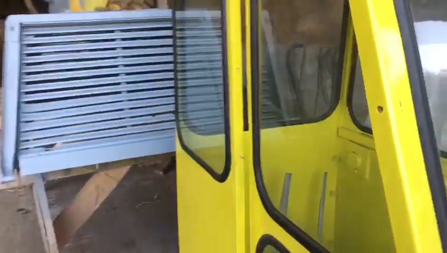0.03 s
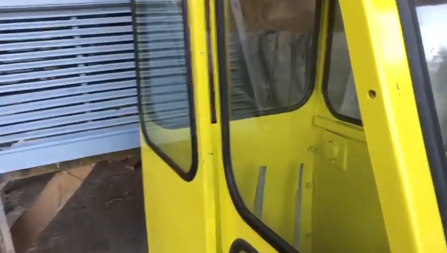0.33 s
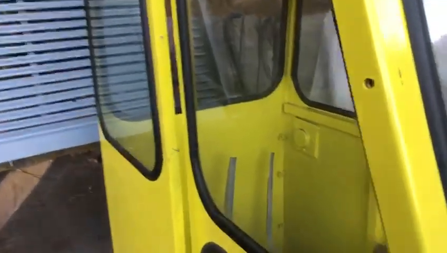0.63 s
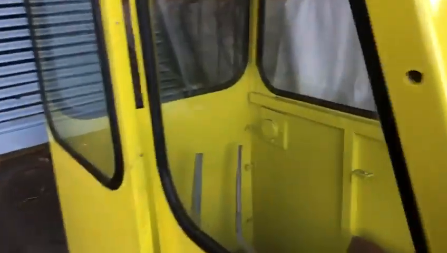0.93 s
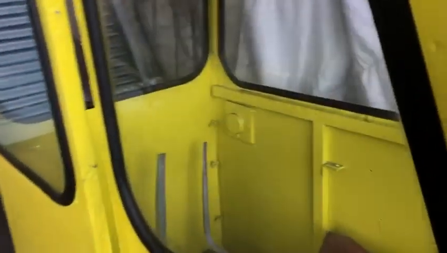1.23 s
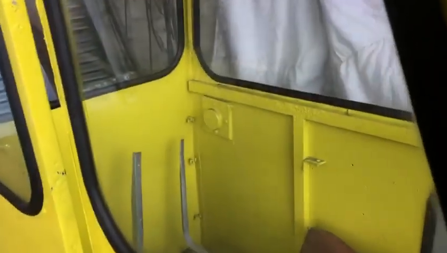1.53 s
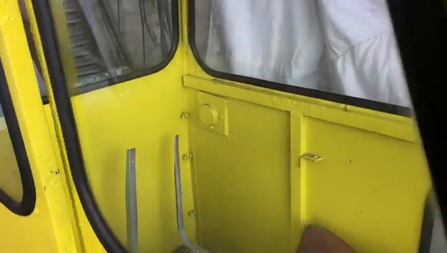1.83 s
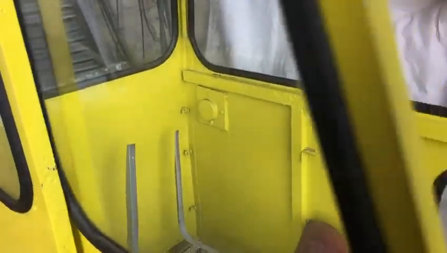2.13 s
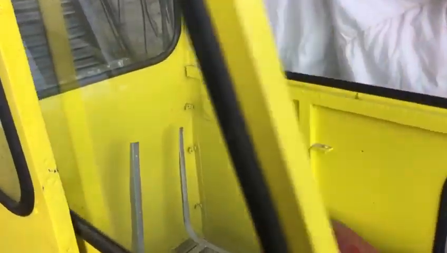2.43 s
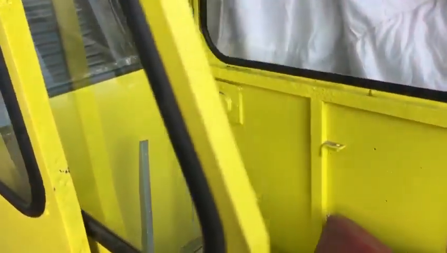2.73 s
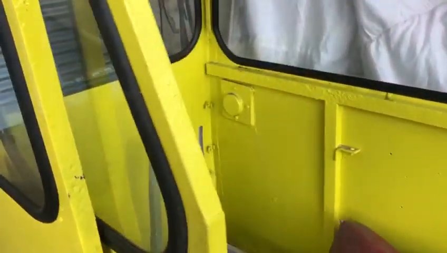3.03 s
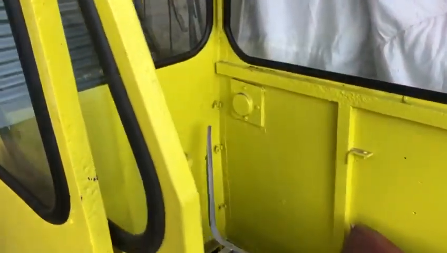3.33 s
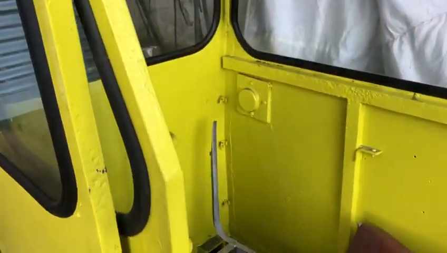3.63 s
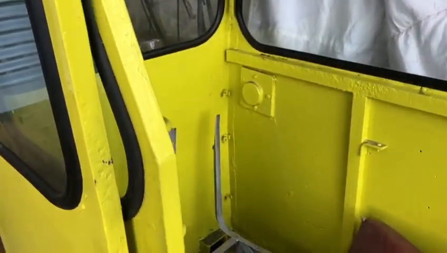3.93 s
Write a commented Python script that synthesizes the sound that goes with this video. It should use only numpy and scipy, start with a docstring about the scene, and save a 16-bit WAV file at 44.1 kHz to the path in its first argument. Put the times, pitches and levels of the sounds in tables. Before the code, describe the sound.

A metal sliding door on a machine cab, heard close up in a workshop. Soft rustling and small ticks come first, then the door rolls with a low rumble, scraping and ringing clatter, ending with a sharp latch knock.

```python
"""A workshop, the microphone close to the steel sliding door of a machine cab.
At first there is only a steady low background, a rustling sleeve, small ticks and a soft bump.
From 1.8 s the door is pushed along its track: the rollers rumble through the panels, while the
runner scrapes in tiny slips, squeals faintly twice and rattles, ringing the rail.
The latch ticks near 3 s and knocks at 3.7 s, as the rolling dies down."""
import sys
import numpy as np
from scipy import signal
from scipy.io import wavfile

SR = 44100
rng = np.random.default_rng(int(sys.argv[2]) if len(sys.argv) > 2 else 0)


def digitize_waveform(pressure):
    """Quantize a signal to 16-bit integers and store it at the path in sys.argv[1].

    Rows of a 2-D input are taken as channels; values are limited to [-1, 1].
    """
    field = np.atleast_2d(pressure).T
    bounded = np.clip(field, -1, 1)
    quanta = np.round(bounded * 32767).astype(np.int16)
    wavfile.write(sys.argv[1], SR, quanta)


N = 176400

# Modes of the steel rail. Each row: pitch in Hz, relative level in dB, t60 in seconds.
RAIL_MODES = [(1170,-1.5,0.21),(1352,0,0.17),(1573,1.5,.12),(1897,0,0.15),(2465,3,0.23),(2647,1.5,0.18),(2835,2.5,0.25),(3050,-3.5,.2),(3230,0,0.18),(3680,-1.5,0.22),(3924,1,0.34),(4334,5,0.23),(4759,1,0.3)]
SLIPS_PER_S, SLIP_SPREAD_DB = 1400, 1  # friction of the runner


def amp(db):
    """Decibels to gain."""
    return 10 ** (np.asarray(db) / 20)


def unit(x):
    """Scales a response to energy 1."""
    return x / np.sqrt(np.sum(x ** 2) + 1e-20)


def level(table, column):
    """Gain over time from one dB column of a curve; silent before it starts."""
    rows, t = np.array(table), np.arange(N) / SR
    return amp(np.interp(t, rows[:, 0], rows[:, column])) * (t >= rows[0, 0])


def add(mix, start, sound):
    """Mixes a sound in at a start in seconds."""
    part = mix[max(round(start * SR), 0):][:len(sound)]
    part += sound[:len(part)]


def through(x, response):
    """Convolves, keeping the length."""
    return signal.fftconvolve(x, response)[:len(x)]


def colour(points, size=16384):
    """Minimum-phase response of energy 1 whose spectrum follows (Hz, dB) points."""
    hz, db = np.transpose(points)
    log_hz = np.log(abs(np.fft.fftfreq(size, 1 / SR)) + 1)
    rolloff_db = 20 * np.maximum(log_hz - np.log(hz[-1]), 0)
    log_gain = np.log(amp(np.interp(log_hz, np.log(hz), db) - rolloff_db))
    spectrum = np.exp(np.conj(signal.hilbert(log_gain)))
    return unit(np.fft.ifft(spectrum).real[:size // 2])


def partials(modes):
    """One dying partial of the given energy for each mode."""
    t = np.arange(SR // 2) / SR
    return [amp(db) * unit(amp(-60 * t / t60) * np.cos(2 * np.pi * hz * t)) for hz, db, t60 in modes]


def ring(modes):
    """Response of a body struck at a random spot."""
    return unit(sum(rng.choice([-1, 1]) * part for part in partials(modes)))


def burst(t60):
    """Dense dying noise: countless small modes and reflections."""
    t = np.arange(SR // 2) / SR
    return rng.standard_normal(len(t)) * amp(-60 * t / t60)


def grains(per_s, spread_db):
    """Random tiny impacts of uneven size, rms 1."""
    size = amp(spread_db * np.minimum(rng.exponential(1, N), 4)) * rng.choice([-1, 1], N)
    return unit(size * (rng.random(N) < per_s / SR)) * np.sqrt(N)


def background():
    """Room tone: steady distant noise with a broad hump in the lows and middle."""
    # Each row: frequency in Hz, relative density in dB.
    spectrum = [(15,-35),(25,-34),(65,2),(110,-2),(190,-1),(280,-1.5),(390,-3.5),(660,-0.5),(880,3.5),(1080,-0.5),(1400,-8),(2000,-18),(3000,-25.5),(5300,-28),(8000,-36.5),(11500,-41.5)]
    # Each row: time in seconds, level in dB.
    drift = [(0,-49.5),(.3,-50),(.47,-50.5),(.65,-49),(1.0,-51),(1.25,-49),(1.45,-51),(1.62,-48.5),(1.85,-47.5),(3.0,-52),(4.0,-46)]
    return level(drift, 1) * through(rng.standard_normal(N), colour(spectrum))


def sleeve():
    """Cloth rustles in swells of tiny creases."""
    # Each row: start, rise and fall in seconds, level in dB.
    rustles = [(-.1,0.071,0.65,-66),(.728,0.028,0.15,-60.5),(.84,.14,0.27,-68.5),(1.06,0.028,0.13,-66.5),(1.08,0.16,0.22,-61)]
    # Each row: frequency in Hz, relative density in dB.
    spectrum = [(500,-5),(2000,-5),(3200,0.5),(5500,-2),(8000,-12),(11500,-19.5)]
    t = np.arange(N) / SR
    swell = sum(amp(db) * np.interp(t, [start, start + rise, start + rise + fall], [0, 1, 0])
                for start, rise, fall, db in rustles)
    return through(swell * grains(per_s=3000, spread_db=2.5), colour(spectrum))


def handling_ticks():
    """Small impacts of handling, each a brief noise centred on one pitch."""
    # Each row: start in seconds, pitch in Hz, level in dB.
    ticks = [(0.271,2580,-55.5),(.773,4600,-57.5),(1.283,3800,-52.5),(1.344,5460,-48.5)]
    out = np.zeros(N)
    for start, hz, db in ticks:
        tint = colour([(hz / 10, -55), (hz / 2, -17), (hz, 0), (hz * 2, -25)])
        add(out, start, amp(db) * through(burst(t60=0.031), tint))
    return out


def panel_bumps():
    """Soft pushes on the panels swell and die within a few cycles."""
    # Each row: start in seconds, pitch in Hz, rise in seconds, peak in dB.
    bumps = [(.766,248,0.013,-46.5),(1.869,124,0.025,-35.5),(2.069,100,0.022,-25.5),(2.162,95,0.03,-21)]
    t = np.arange(SR // 2) / SR
    out = np.zeros(N)
    for start, hz, rise, db in bumps:
        swell = (t / rise * np.exp(1 - t / rise)) ** 3
        add(out, start, amp(db) * swell * np.sin(2 * np.pi * hz * t))
    return out


def sheet(spectrum, modes, modes_db):
    """Response of a damped sheet with its modes standing out."""
    broad = np.pad(colour(spectrum), (0, SR // 2))
    ringing = unit(through(broad, sum(partials(modes))))
    return unit(broad + amp(modes_db) * ringing)


def rollers():
    """The rollers run over bumps in the track and shake the door panels."""
    # Each row: time in seconds, then panel boom, roller rumble and track grind in relative dB.
    travel = [(1.8,-96,-60,-63),(1.87,-62,-61,-59),(1.93,-45.5,-41.5,-49),(2.03,-37,-35.5,-45.5),(2.18,-28.5,-28,-42.5),(2.26,-33.5,-29.5,-39.5),(2.37,-22.5,-26,-38),(2.47,-33,-27.5,-35.5),(2.58,-26.5,-29,-35.5),
              (2.69,-31,-27.5,-33.5),(2.76,-30.5,-24,-31),(2.85,-24.5,-26.5,-34.5),(2.95,-32.5,-24,-35),(3.1,-32,-25.5,-38.5),(3.2,-34,-33,-44.5),(3.3,-34,-29,-47),(3.48,-40.5,-29,-41.5),(3.6,-33.5,-37.5,-49.5),(3.65,-35.5,-39,-49),(3.8,-39,-34.5,-50),(3.88,-40.5,-43,-61),(4.0,-42.5,-44,-55)]
    # Their three spectra. Each row: frequency in Hz, relative density in dB.
    boom = [(15,-44),(25,-34),(33,-7.5),(46,-9.5),(60,-1),(100,-5.5),(135,-21.5),(250,-56)]
    rumble = [(20,-61),(50,-35),(90,-9.5),(120,0.5),(200,3),(300,-1),(380,-7.5),(460,-12.5),(700,-23),(1500,-46.5)]
    grind = [(50,-57),(200,-25),(400,-6),(530,3),(750,-1),(1100,-6),(1500,-8.5),(3000,-25.5)]
    # Each row: pitch in Hz, relative level in dB, t60 in seconds.
    panel_modes = [(61.7,-9,0.52),(108.6,-8.5,0.24),(140.7,13,0.74),(189.4,0,.17),(229.4,4.5,0.36),(299.7,12.5,0.12),(390,6.5,.27),(519.2,10,1),(751,11,1),(1062,14.5,.3)]
    out = np.zeros(N)
    for column, spectrum, db in [(1, boom, 0.73), (2, rumble, -1.06), (3, grind, -2.8)]:
        force = level(travel, column) * grains(per_s=900, spread_db=1.5)
        out += amp(db) * through(force, sheet(spectrum, panel_modes, modes_db=-8))
    return out


def wander(spread_db=4, per_s=8.7):
    """Slow random gain of mean power 1."""
    knots = rng.standard_normal(200)
    drift = np.interp(np.arange(N) / SR * per_s, np.arange(len(knots)), knots)
    return unit(amp(spread_db * drift)) * np.sqrt(N)


def cab(x, reflections_db=3):
    """Adds the short reflections of the steel cab, keeping the power."""
    reflections = through(x, unit(burst(t60=0.055)))
    return (x + amp(reflections_db) * reflections) / np.hypot(1, amp(reflections_db))


def rub(force, spectrum, modes, modes_db):
    """Tiny slips excite a body whose modes swell and fade as the contact travels."""
    tint, parts = colour(spectrum), partials(modes)
    slips = through(force * grains(SLIPS_PER_S, SLIP_SPREAD_DB), tint)
    ringing = sum(through(slips * wander(), part) for part in parts)
    ringing /= np.linalg.norm(through(sum(parts), tint))
    return (cab(slips) + amp(modes_db) * ringing) / np.hypot(1, amp(modes_db))


def runner():
    """Close to the microphone, the sliding runner rings the rail and hisses in its bracket."""
    # Each row: time in seconds, then ringing scrape and dry hiss in relative dB.
    friction = [(1.87,-85,-95),(1.91,-63,-62.5),(2.02,-62,-59),(2.08,-60,-62),(2.25,-57,-53),(2.32,-45,-52),(2.42,-55,-64),(2.485,-59,-72),
                (2.497,-46,-51.5),(2.57,-50,-52),(2.61,-41.5,-66),(2.632,-41,-67),(2.68,-38.5,-49),(2.74,-45.5,-46.5),(2.8,-51,-54),(2.825,-45.5,-48),(2.858,-46,-61),
                (2.877,-36,-47),(2.92,-43,-53),(2.96,-48,-65),(3.05,-56,-56),(3.095,-47,-54.5),(3.18,-59.5,-61.5),(3.24,-53,-59.5),(3.32,-51,-59.5),(3.36,-67,-63),
                (3.42,-51,-55.5),(3.5,-48.5,-61),(3.6,-55.5,-65.5),(3.7,-59.5,-72),(3.86,-53,-69),(4.0,-103,-87)]
    # Each row: frequency in Hz, relative density in dB.
    scrape_spectrum = [(500,-17.5),(1300,-9),(1800,-1.5),(2150,7),(2700,-2),(3400,-1.5),(4400,-7),(6000,-8.5),(9000,-27),(12000,-36)]
    hiss_spectrum = [(1000,-37),(2800,-11),(3500,-6.5),(4700,-0.5),(5600,-4),(7000,-4.5),(9000,-13.5),(10000,-19),(11500,-23)]
    # Each row: pitch in Hz, relative level in dB, t60 in seconds.
    bracket_modes = [(4360,0,0.03),(5590,-1.5,.025),(6730,-6.5,0.043)]
    scrape = rub(level(friction, 1), scrape_spectrum, RAIL_MODES, modes_db=-7)
    hiss = rub(level(friction, 2), hiss_spectrum, bracket_modes, modes_db=-6.5)
    return amp(-1.5) * (scrape + hiss)


def squeals():
    """The runner catches and breaks free: short runs of slips ring a few of its high modes."""
    # Each row: start and length in seconds, level in dB.
    catches = [(1.89,0.12,-57.5),(2.484,0.038,-47.5)]
    # Each row: pitch in Hz, relative level in dB, t60 in seconds.
    runner_modes = [(3420,4.5,0.088),(3520,-3,0.081),(3895,0,0.056),(5280,-1.5,0.047)]
    t = np.arange(N) / SR
    ramp_s, shape = 0.0073, [0.013, 0.73, 0.96, 0]
    force = sum(amp(db) * np.interp(t - start, [0, ramp_s, length, length + ramp_s], shape)
                for start, length, db in catches)
    return through(force * grains(SLIPS_PER_S, SLIP_SPREAD_DB), ring(runner_modes))


def rattles():
    """The runner jumps and hits the rail: a short clatter, then the modes ring on."""
    # Each row: start in seconds, centre pitch in Hz, level in dB.
    hits = [(2.587,1990,-41),(2.625,2200,-36),(2.635,2400,-31),(2.647,2180,-32),(2.699,2180,-37),(2.717,1700,-37),(2.737,1300,-36),(2.869,1300,-34),(2.88,1800,-30.5),(2.893,3020,-33)]
    out = np.zeros(N)
    for start, hz, db in hits:
        clatter = burst(t60=0.16)
        size = np.linalg.norm(clatter)
        ringing = amp(-2) * size * ring(RAIL_MODES)
        tint = colour([(hz / 10, -28), (hz / 2, -4), (hz, 0), (hz * 2, -10), (hz * 4, -29)])
        add(out, start, amp(db) * size * unit(through(clatter + ringing, tint)))
    return out


def latch():
    """Each contact of the latch gives a tick, a clack and a metallic ring."""
    # Each row: start in seconds, then ring, clack and tick in relative dB.
    knocks = [(2.968,-60,-47.5,-35.5),(2.983,-59,-52,-43.5),(3.728,-46,-38,-42.5),(3.7305,-39,-33,-48),(3.737,-31.5,-36,-54),(3.756,-39,-42,-56)]
    # Latch and frame. Each row: pitch in Hz, relative level in dB, t60 in seconds.
    modes = [(1335,0.5,0.31),(1652,3,0.22),(1994,-13,.35),(2600,-3,.3),(2845,2.5,0.15),(3214,2,0.16),(3750,-7.5,0.15),(4360,-8.5,0.36),(4544,-6,.26),(4990,-8,.21)]
    # Each row: frequency in Hz, relative density in dB.
    clack_spectrum = [(200,-25),(800,-7),(1400,8.5),(1800,0.5),(2250,-9.5),(2900,-7),(3700,-1.5),(4600,-7.5),(6000,-17),(7800,-17),(10000,-36.5)]
    tick_spectrum = [(1000,6),(3500,6.5),(5700,10),(7500,1),(9000,-7),(11500,-26)]
    strike_s = 0.0017
    attack = np.minimum(np.arange(SR // 2) / SR / strike_s, 1)
    out = np.zeros(N)
    for start, ring_db, clack_db, tick_db in knocks:
        metal, clatter = ring(modes), burst(t60=0.34)
        ringing = amp(ring_db) * metal * np.linalg.norm(clatter)
        clack = amp(clack_db) * through(clatter, colour(clack_spectrum))
        tick = amp(tick_db) * through(burst(t60=0.15), colour(tick_spectrum))
        add(out, start, attack * (ringing + clack + tick))
    return amp(-2) * out


def scene():
    """Room tone, handling and the door at one close microphone."""
    door = rollers() + runner() + rattles() + squeals() + latch()
    handling = sleeve() + handling_ticks() + panel_bumps()
    return (background() + handling + door)[None]


def record(dry):
    """The microphone channel cuts off steeply above 11.9 kHz."""
    lowpass = signal.firwin(511, 11900, window=("kaiser", 9), fs=SR)
    return signal.oaconvolve(dry, lowpass[None], "same")


dry = scene()
out = record(dry)
digitize_waveform(out)
```